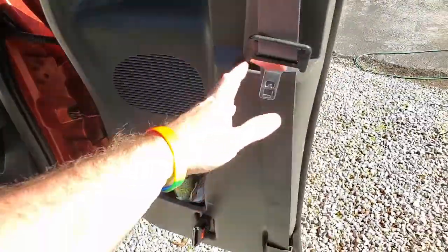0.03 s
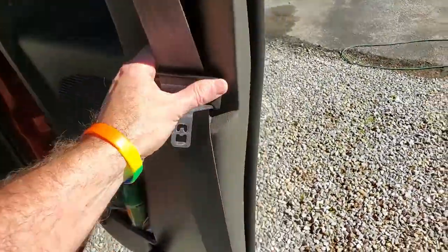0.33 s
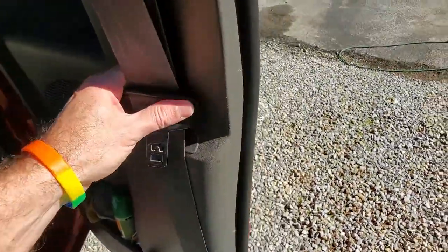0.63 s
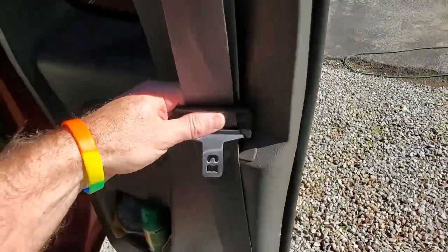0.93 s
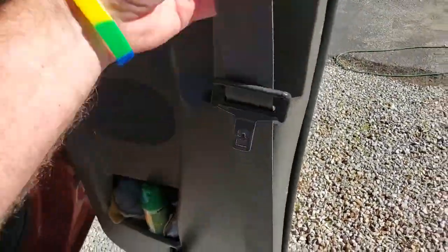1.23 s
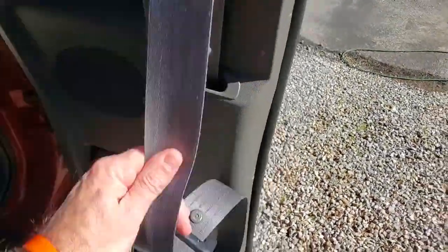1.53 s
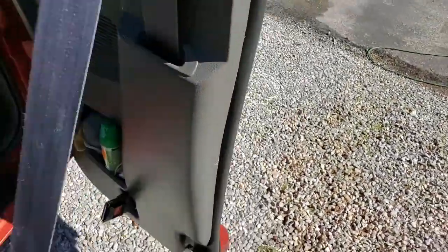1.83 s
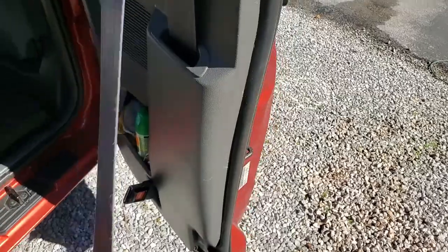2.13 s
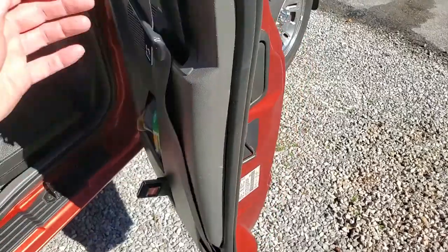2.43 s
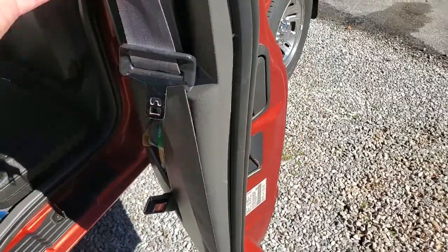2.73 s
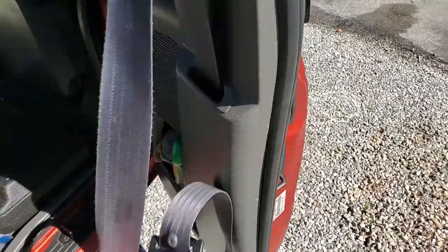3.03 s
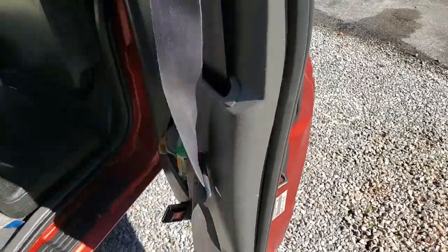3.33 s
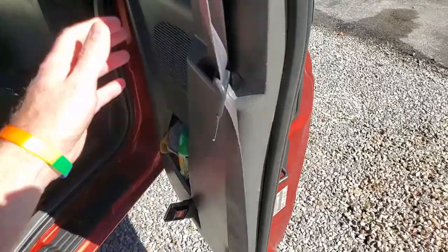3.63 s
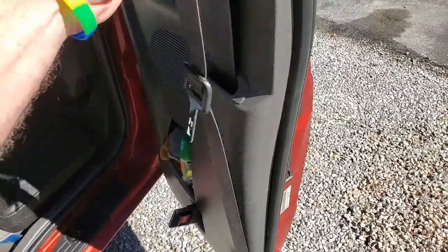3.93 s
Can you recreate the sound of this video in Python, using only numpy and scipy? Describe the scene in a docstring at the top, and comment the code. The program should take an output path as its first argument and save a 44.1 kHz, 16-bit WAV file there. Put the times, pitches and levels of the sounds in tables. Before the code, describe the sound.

A seatbelt pulled out and released, webbing hissing, its latch plate clacking against plastic trim.

```python
"""A seatbelt is drawn from a car's door pillar and let go twice, close up, outdoors over a machine's hum.
First the latch plate ticks and scuffs on the hollow plastic trim, and the slowly drawn webbing hisses,
rasps and whistles through its guide. From 1.6 s the belt makes three quick runs, its weave singing
with the speed; each ends with the plate clacking on the trim, which booms briefly. The hardest hits
fall near 2.5 s and between 3.2 and 3.7 s, then the hiss dies away."""
import sys
import numpy as np
from scipy import signal
from scipy.fft import rfft, irfft
from scipy.io import wavfile

SR = 44100
rng = np.random.default_rng(int(sys.argv[2]) if len(sys.argv) > 2 else 0)


def unload_audio(sound):
    """Save the sound as a 16-bit wav file, at the path given as the first command line argument."""
    columns = np.transpose(np.atleast_2d(sound))
    # keep every value between -1 and 1, then stretch to whole-number steps
    steps = np.round(np.clip(columns, -1, 1) * 32767)
    wavfile.write(sys.argv[1], SR, steps.astype(np.int16))


N = 176400
TIME, FREQ = np.arange(N) / SR, np.arange(N // 2 + 1) * SR / N


def undb(db):
    return 10 ** (np.asarray(db) / 20)


def unit_rms(x):
    return x / np.sqrt(np.mean(x ** 2))


def automation(rows, column=1):
    """One column of a table, ramped from point to point in time."""
    rows = np.array(rows)
    return np.interp(TIME, rows[:, 0], rows[:, column])


def spectral_curve(points):
    """Breakpoints joined along a log frequency axis."""
    hz, values = np.array(points).T
    return np.interp(np.log(FREQ + 1), np.log(hz), values)


def wander(rate_hz):
    """Smooth random modulation with a spread of 1."""
    return unit_rms(irfft(rfft(rng.standard_normal(N)) * np.exp(-.5 * (FREQ / rate_hz) ** 2), N))


def grain(depth, rate_hz=500):
    """The flickering gain of fibres catching and slipping."""
    return unit_rms(np.exp(depth * wander(rate_hz)))


# how alike left and right are (f/Hz, coherence/0-1)
COHERENCE = [(300, 1), (700, .7), (1500, 0.14), (3000, 0.078), (12000, 0.45)]
RIGHT_LAG_S = 0.0001


def stereo_noise(gain):
    """Shaped noise, alike on both sides in the bass and a little late on the right below 3 kHz."""
    left, other = rfft(rng.standard_normal((2, N)))
    alike = np.clip(spectral_curve(COHERENCE), 0, 1)
    lag = np.where(FREQ < 3000, np.exp(-2j * np.pi * FREQ * RIGHT_LAG_S), 1)
    right = alike * left * lag + np.sqrt(1 - alike ** 2) * other
    return unit_rms(irfft(np.array([left, right]) * gain, N))


def eq_noise(eq):
    return stereo_noise(undb(spectral_curve(eq)))


# EQ of the outdoor rumble (f/Hz, level/dB)
RUMBLE_EQ = [(20, -36), (55, -1), (75, -1.5), (165, -10), (250, -17.5), (360, -18.5), (445, -11),
             (560, -30), (700, -26.5), (870, -18), (1020, -25.5), (1250, -27), (1700, -33.5), (3000, -52),
             (15000, -70)]
# fader rides of the rumble and the hum (t/s, level/dB)
RUMBLE_FADER = [(0, -34), (.7, -40), (2.9, -42.5), (4, -46)]
HUM_FADER = [(0, -46.5), (.15, -38.5), (1.2, -37), (1.85, -36), (2.2, -48.5), (2.9, -43.5), (3.3, -43.5),
             (4, -50.5)]
HUM_HZ, HUM_WOW, FIFTH_HARMONIC_DB = 94.8, 0.02226, -21.5


def rumble_and_hum():
    """The bed: outdoor rumble and the wavering hum of a distant machine."""
    phase = 2 * np.pi * np.cumsum(HUM_HZ * (1 + HUM_WOW * wander(3.02))) / SR
    overtone = undb(FIFTH_HARMONIC_DB + 3 * wander(8)) * np.sin(5 * phase)
    hum = np.sqrt(2) * (np.sin(phase) + overtone)
    rumble = eq_noise(RUMBLE_EQ) * undb(automation(RUMBLE_FADER) + .7 * wander(4))
    return rumble + hum * undb(automation(HUM_FADER) + 1.5 * wander(5))


# small snaps of the latch plate and guide (t/s, f/Hz, bandwidth/Hz, level/dB)
SNAP_CUES = [(0.1678, 6500, 9000, -47.5), (.198, 4500, 5000, -53), (0.2233, 5970, 7000, -51),
             (0.2445, 3630, 1400, -33), (.3368, 3770, 1100, -37), (0.4042, 1360, 500, -27),
             (.588, 9050, 8000, -44), (1.4783, 2130, 354, -39.5), (1.7409, 1150, 130, -26.5),
             (1.8472, 3850, 900, -37), (1.868, 780, 55, -26.5), (2.700, 9200, 8000, -48),
             (3.1819, 1520, 110, -25), (3.9458, 4140, 3000, -61)]
SKID_DECAY_S, SKID_GAIN = 0.003, 0.24


def latch_snaps():
    """A hard contact and a brief skid ring one resonance of a small part."""
    out = np.zeros((2, N))
    t = np.arange(SR // 20) / SR
    for at, hz, width_hz, db in SNAP_CUES:
        skid = SKID_GAIN * rng.standard_normal((2, len(t))) * np.exp(-t / SKID_DECAY_S)
        push = (t == 0) + skid * min(hz / 5000, 1)
        ring = np.sin(2 * np.pi * hz * t) * np.exp(-np.pi * width_hz * t)
        snap = signal.fftconvolve(push, ring[None], axes=1)[:, :len(t)]
        snap = undb(db) * unit_rms(snap) * np.sqrt(0.002 / t[-1])  # the energy of 2 ms at the cue level
        i = int(at * SR)
        out[:, i:i + len(t)] += snap[:, :N - i]
    return out


# fader rides of the belt in its guide (t/s, rub level/dB, hiss level/dB)
WEBBING_FADERS = [(.235, -90, -84), (.27, -46.5, -59), (.85, -62.5, -61.5), (.98, -70.5, -71),
                  (1.18, -54, -59), (1.36, -57.5, -64.5), (1.42, -55.5, -48.5), (1.55, -53, -53),
                  (1.73, -40, -40.5), (1.85, -48, -46.5), (1.93, -58.5, -63), (2.03, -62.5, -60),
                  (2.17, -50.5, -53), (2.43, -46.5, -48.5), (2.55, -47, -71), (2.65, -63.5, -71),
                  (2.87, -78.5, -71.5), (2.95, -69, -64), (3.1, -53.5, -54), (3.17, -37.5, -33.5),
                  (3.28, -49, -55), (3.4, -59, -67), (3.58, -60, -59), (3.61, -50, -49.5),
                  (3.7, -55, -68.5), (3.78, -58.5, -82.5), (4.0, -80.5, -72)]
# EQs of the low rub and the bright hiss (f/Hz, level/dB)
RUB_EQ = [(150, -1), (400, 14.5), (900, -3), (1500, 4.5), (2200, 1), (3600, -1), (4600, -8.5),
          (7000, -16.5), (14000, -29)]
HISS_EQ = [(2000, -12), (4500, -10), (8200, -2.5), (10500, 3), (13000, -3.5), (15600, 1.5)]
WEBBING_GRAIN, FLUTTER_DB, TWIST_DB = 0.43, 1.5, 2.5


def webbing_slide():
    """The woven belt rubs and hisses over its guide; the hiss shifts colour as the belt twists."""
    rub = eq_noise(RUB_EQ) * undb(automation(WEBBING_FADERS, column=1))
    spectrum = rfft(eq_noise(HISS_EQ))
    octave = np.log2(FREQ + 1)
    hiss = np.zeros((2, N))
    for centre in np.arange(10, 14.4, 1 / 3):  # third-octave bands from 1 kHz up
        band = irfft(spectrum * np.maximum(1 - 3 * abs(octave - centre), 0), N)
        hiss += band * undb(TWIST_DB * wander(8))
    hiss = unit_rms(hiss) * undb(automation(WEBBING_FADERS, column=2))
    return (rub + hiss) * grain(WEBBING_GRAIN, rate_hz=550) * undb(FLUTTER_DB * wander(25))


# resonances of the hollow trim, for scuffs and hits (f/Hz, level/dB, t60/s)
TRIM_MODES = [(146, -3.5, 0.084), (172.7, 4.5, 0.1), (206, -8.5, 0.073), (280.7, -7.5, 0.16),
              (316.8, 0.5, .1), (331, -1.5, 0.12), (379.7, -1.5, 0.095), (423, -10.5, 0.19),
              (479.8, -12.5, 0.2), (553, -10.5, 0.15), (680, -13.5, 0.13), (886, -7.5, 0.096)]
# EQs of the mid knock, hard clack and metal tick, for scuffs and hits (f/Hz, level/dB)
KNOCK_EQ = [(250, -29.5), (480, -6.5), (780, 9), (950, -0.5), (1150, 1), (1360, -1.5), (1550, 3),
            (1900, -3), (2600, -14.5), (5000, -50)]
CLACK_EQ = [(1000, -29), (1900, -5.5), (2700, 1), (3300, -3), (4000, -3), (4700, -10.5), (6500, -18),
            (12000, -36.5)]
TICK_EQ = [(2500, -22.5), (5000, -2), (6800, -8), (8200, -1.5), (10200, 0), (12000, -3.5), (14000, -4),
           (15600, -5.5)]
# scuffs along the trim (t/s, length/s, then level/dB of boom, knock, clack, tick)
SCUFF_CUES = [(0.241, .11, -34, -54, -53, -51.5), (0.394, 0.061, -37, -57, -66, -49),
              (0.749, 0.013, -41.5, -48, -78, -45), (1.754, 0.1, -39, -54, -49.5, -45),
              (1.847, 0.071, -32.5, -49.5, -59, -78), (2.395, 0.024, -31.5, -63, -47, -62),
              (2.444, 0.056, -33, -34, -35, -50), (2.527, 0.078, -35, -59, -57.5, -60),
              (3.199, 0.054, -22, -43, -53, -55), (3.292, 0.042, -38, -39.5, -44.5, -42),
              (3.351, 0.011, -29.5, -43, -38, -47), (3.449, 0.092, -29, -39, -45, -56),
              (3.642, 0.051, -35.5, -43, -44, -60), (3.71, 0.013, -30.5, -34, -36, -36)]
SCUFF_ATTACK_S, SCUFF_RELEASE_S, SCUFF_GRAIN = 0.0025, 0.053, 0.47


def trim_scuffs():
    """Belt and plate rub along the trim, shaking its resonances under a grainy scrape."""
    power = sum(undb(db) ** 2 / (1 + ((FREQ - hz) * t60 / 3.88) ** 2) for hz, db, t60 in TRIM_MODES)
    bandpass = FREQ / np.hypot(FREQ, 120) / np.hypot(1, FREQ / 900)
    layers = [stereo_noise(np.sqrt(power) * bandpass)]
    layers += [eq_noise(eq) * grain(SCUFF_GRAIN) for eq in (KNOCK_EQ, CLACK_EQ, TICK_EQ)]
    gains = np.zeros((len(layers), N))
    for at, length, *layer_dbs in SCUFF_CUES:
        attack = np.clip((TIME - at) / SCUFF_ATTACK_S, 0, 1)
        release = np.clip((at + length - TIME) / SCUFF_RELEASE_S + .5, 0, 1)
        gains += undb(layer_dbs)[:, None] * attack * release
    return sum(layer * gain for layer, gain in zip(layers, gains))


# plate hits on the trim (t/s, boom level/dB, boom f/Hz, level/dB of knock, clack, tick, contact/ms)
HIT_CUES = [(0.2446, -27, 212, -31, -52, -41.5, 1.4), (0.313, -27.5, 235, -32.5, -36.5, -44, 3.2),
            (0.404, -30.5, 350, -49, -49, -58, 0.83), (1.7404, -35, 450, -37, -37.5, -62, 0.54),
            (1.863, -19, 254, -33.5, -41, -56, 3.26), (2.4488, -41, 400, -29, -26, -26, 1.2),
            (2.4743, -11, 219, -27, -26.5, -13.5, 2.5), (2.5053, -11, 272, -16.5, -14.5, -23.5, 1.14),
            (2.522, -39, 300, -37, -24.5, -26, 0.75), (3.1759, -8.5, 494, -17.5, -25.5, -22, 4.65),
            (3.19, -15, 530, -22.5, -30, -37, 3.13), (3.412, -7, 260, -22.5, -19.5, -28, 0.5),
            (3.4445, -19.5, 360, -31, -30, -43.5, 0.58), (3.6515, -40, 328, -37.5, -35.5, -28, 1.6),
            (3.701, -31.5, 300, -45, -43, -34.5, 0.89), (3.7234, -15, 307, -19.5, -20.5, -26, 0.57)]
BOOM_WIDTH_OCT, BOOM_LAG_S, MODE_DETUNE = 0.66, 0.000067, .015
LAYER_DECAYS_S = 0.0067, 0.0039, 0.0039  # knock, clack, tick
CRACK_DB, CRACK_S = -4, 0.001  # transient at the first instant of contact


def plate_hits():
    """Each hit of the latch plate sets the trim booming under a knock, a clack and a metal tick."""
    out = np.zeros((2, N))
    layers = [eq_noise(eq) for eq in (KNOCK_EQ, CLACK_EQ, TICK_EQ)]
    hz, mode_db, t60 = np.array(TRIM_MODES).T[:, :, None]
    for at, boom_db, boom_hz, *layer_dbs, contact_ms in HIT_CUES:
        i = int(at * SR)
        t = np.arange(min(SR // 2, N - i)) / SR
        span = slice(i, i + len(t))
        contact_s = contact_ms / 1000
        detune, stagger = rng.standard_normal((2, len(TRIM_MODES), 1))
        mode_hz = hz * (1 + MODE_DETUNE * detune)
        weight = undb(mode_db) * np.exp(-.5 * (np.log2(hz / boom_hz) / BOOM_WIDTH_OCT) ** 2)
        weight /= np.sqrt(np.sum(weight ** 2) / 2)
        swell = 1 - np.exp(-t / (2 * contact_s))
        for side in range(2):
            age = np.maximum(t - side * BOOM_LAG_S - contact_s * abs(stagger), 0)
            modes = weight * np.sin(2 * np.pi * mode_hz * age) * np.exp(-np.log(1000) * age / t60)
            out[side, span] += undb(boom_db) * modes.sum(0) * swell
        attack = np.minimum(t / contact_s, 1)
        since_release = np.maximum(t - 1.27 * contact_s, 0)
        crack = undb(CRACK_DB) * np.exp(1 - (t + contact_s) / CRACK_S)
        for layer, db, decay_s in zip(layers, layer_dbs, LAYER_DECAYS_S):
            envelope = attack * np.exp(-since_release / decay_s) + crack
            out[:, span] += undb(db) * envelope * layer[:, span]
    return out


# rasp, then thin whistle, of the slow draw (start t/s, end t/s, f/Hz, half-width/Hz, level/dB, spurt/0-1)
WHISTLE_CUES = [(.33, 0.923, 3000, 790, -59, 0.03), (1.05, 1.466, 3480, 140, -66, 0.4)]
SPURT_HZ, WHISTLE_FADE_S = 22, 0.057


def belt_whistles():
    """The slowly drawn webbing rasps evenly, then whistles in spurts as it catches and slips."""
    out = np.zeros((2, N))
    for start, end, hz, half_width_hz, db, spurt in WHISTLE_CUES:
        band = stereo_noise(1 / (1 + ((FREQ - hz) / half_width_hz) ** 2))
        fade = np.clip(np.minimum(TIME - start, end - TIME) / WHISTLE_FADE_S, 0, 1)
        out += band * undb(db) * grain(spurt, SPURT_HZ) * fade
    return out


# pitch glides of the weave, one for each quick run of the belt (t/s, f/Hz, level/dB)
WEAVE_GLIDES = [
    [(1.59, 900, -53), (1.655, 1380, -43.5), (1.715, 2020, -38.5), (1.755, 2230, -39), (1.79, 1900, -37),
     (1.83, 1400, -56)],
    [(2.14, 784, -56), (2.27, 975, -46.5), (2.41, 1300, -47), (2.46, 1350, -51)],
    [(3.08, 780, -49.5), (3.12, 1500, -50), (3.165, 2080, -41.5), (3.19, 2200, -30), (3.21, 1200, -37.5)],
]
# a lower second voice of the weave during the first run (t/s, f/Hz, level/dB)
LOWER_GLIDE = [(1.71, 1490, -47), (1.755, 1650, -46), (1.805, 1195, -42)]
WEAVE_WIDTH_HZ, PURE_TONE_GAIN, WEAVE_FADE_S = 90, .52, 0.0033


def weave_song(glide):
    """Ribs of the weave pass an edge: a rough tone whose pitch follows the belt's speed."""
    rib_hz = automation(glide)
    phase = 2 * np.pi * np.cumsum(rib_hz) / SR
    start, end = glide[0][0], glide[-1][0]
    fade = np.clip(np.minimum(TIME - start, end - TIME) / WEAVE_FADE_S, 0, 1)
    roughness = .5 * (wander(WEAVE_WIDTH_HZ) + 1j * wander(WEAVE_WIDTH_HZ))
    left = (PURE_TONE_GAIN + roughness) * np.exp(1j * phase)
    right = left * np.exp(-2j * np.pi * rib_hz * RIGHT_LAG_S)
    return np.array([left, right]).real * fade * undb(automation(glide, column=2))


def low_cut(x, hz):
    return signal.sosfilt(signal.butter(2, hz, "high", fs=SR, output="sos"), x)


TAIL_DB, TAIL_DECAY_S = -7, 0.0079


def doorway_reflections(x):
    """Add a short, bright tail: dense reflections between pillar, door and seat."""
    t = np.arange(SR // 10) / SR
    tail = rng.standard_normal((2, len(t))) * np.exp(-t / TAIL_DECAY_S) * (t > .002)
    tail *= undb(TAIL_DB) / np.sqrt(np.sum(tail ** 2, axis=1, keepdims=True))
    return x + signal.fftconvolve(low_cut(x, hz=700), tail, axes=1)[:, :N]


# EQ on the right channel, leaning the mix to the left (f/Hz, level/dB)
RIGHT_EQ = [(40, -4.5), (300, -7.3), (1100, -7.6), (4000, -3.5), (8000, -4), (12000, -8), (15500, -6)]


def scene():
    """The close belt and trim in the door opening, over the outdoor bed."""
    close = plate_hits() + latch_snaps() + trim_scuffs() + webbing_slide() + belt_whistles()
    close += sum(weave_song(glide) for glide in WEAVE_GLIDES + [LOWER_GLIDE])
    close = low_cut(close, hz=130)  # the panel radiates little bass
    left, right = doorway_reflections(close) + rumble_and_hum()
    right = irfft(rfft(right) * undb(spectral_curve(RIGHT_EQ)), N)
    return np.array([left, right])


def record(dry):
    """Clip at full scale, then cut steeply above 15.9 kHz."""
    return signal.sosfilt(signal.ellip(10, .2, 80, 15900, fs=SR, output="sos"), np.clip(dry, -1, 1))


dry = scene()
out = record(dry)
unload_audio(out)
```